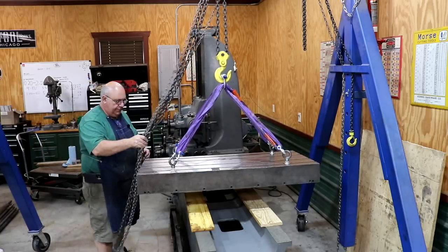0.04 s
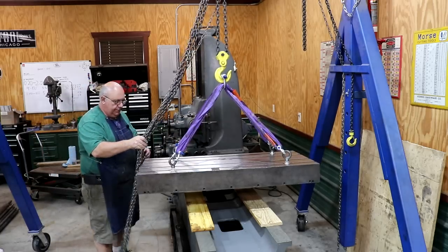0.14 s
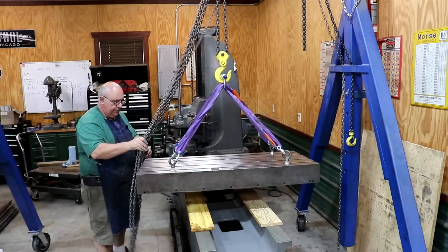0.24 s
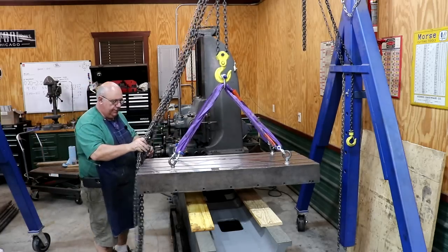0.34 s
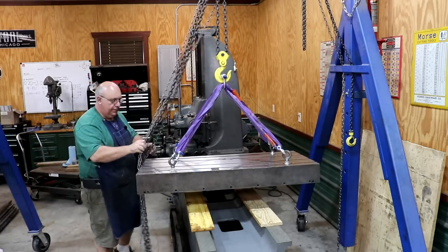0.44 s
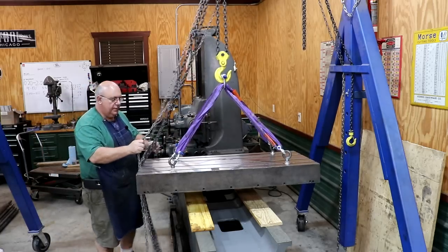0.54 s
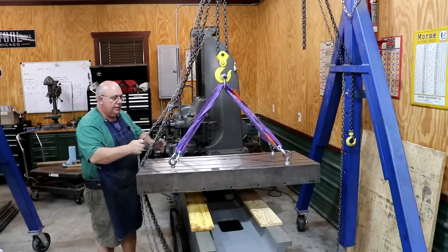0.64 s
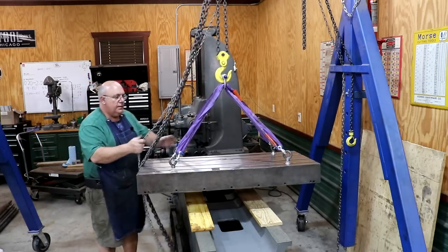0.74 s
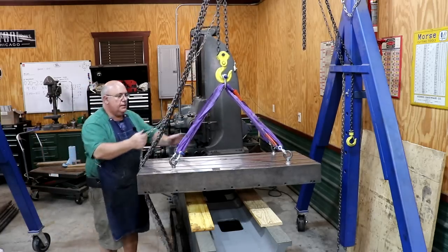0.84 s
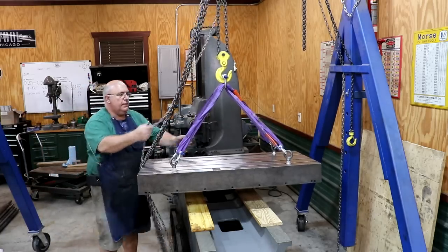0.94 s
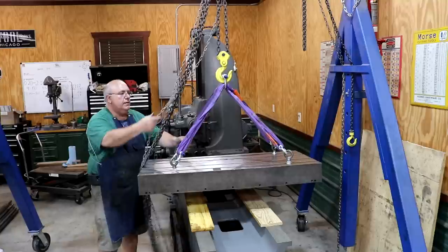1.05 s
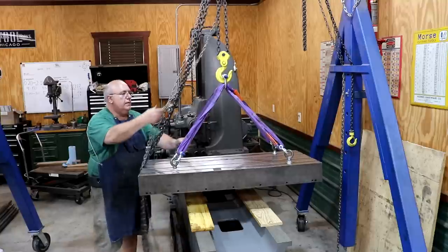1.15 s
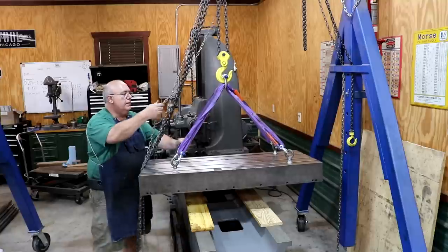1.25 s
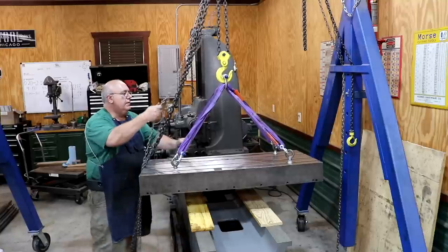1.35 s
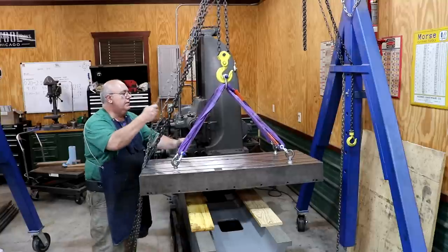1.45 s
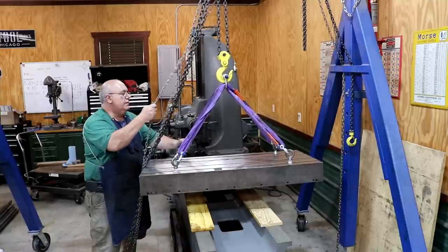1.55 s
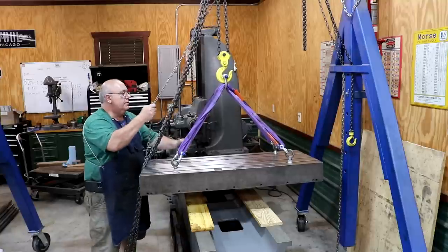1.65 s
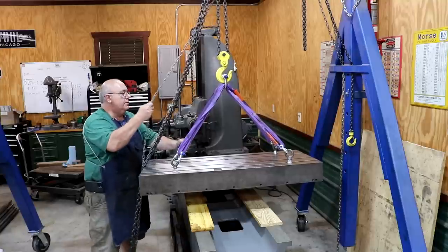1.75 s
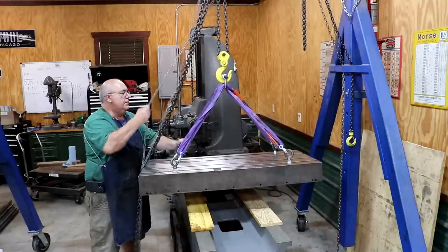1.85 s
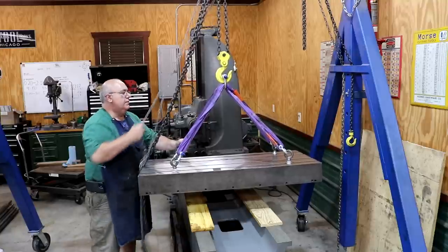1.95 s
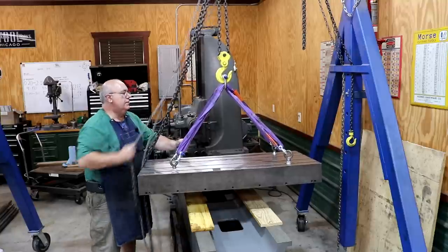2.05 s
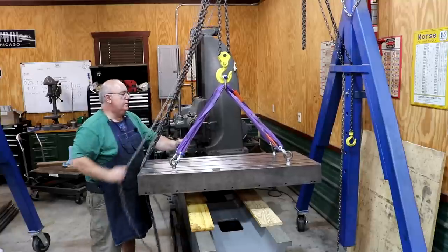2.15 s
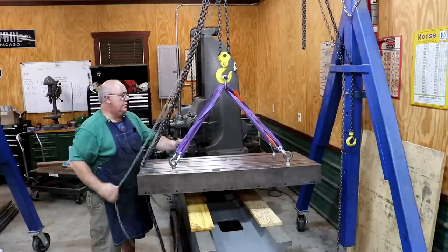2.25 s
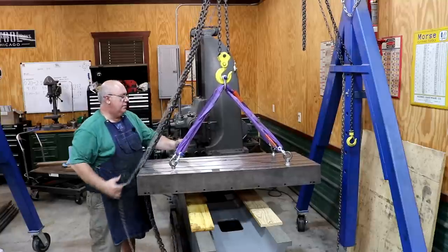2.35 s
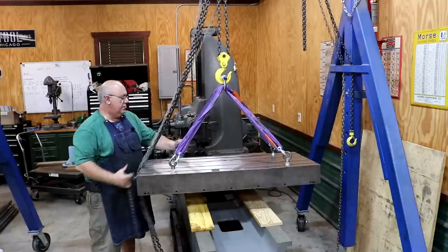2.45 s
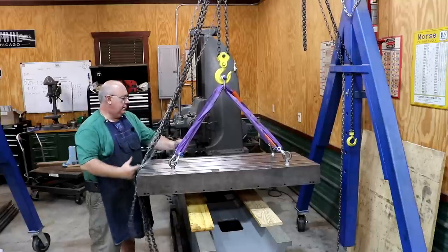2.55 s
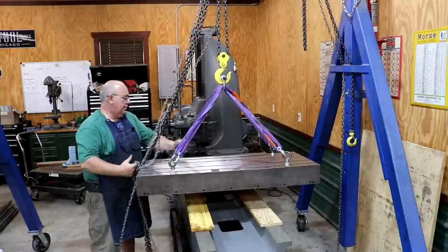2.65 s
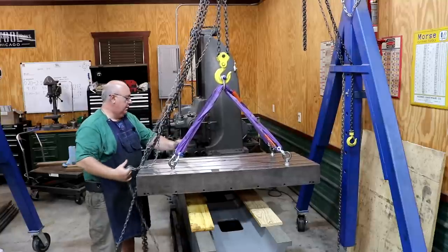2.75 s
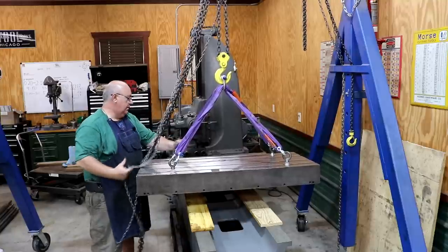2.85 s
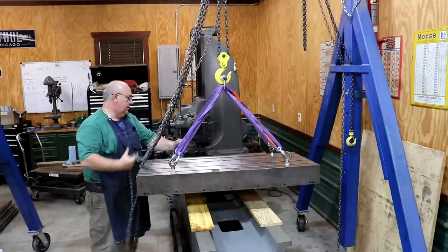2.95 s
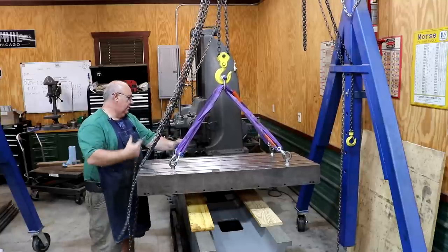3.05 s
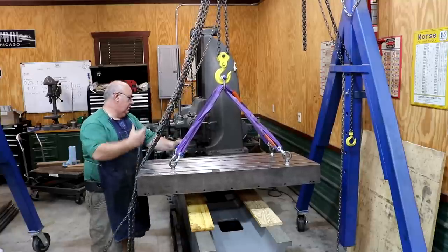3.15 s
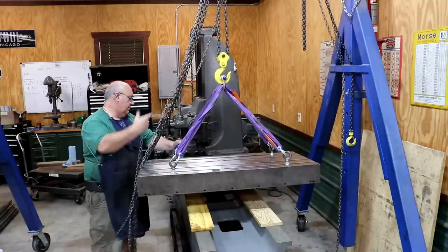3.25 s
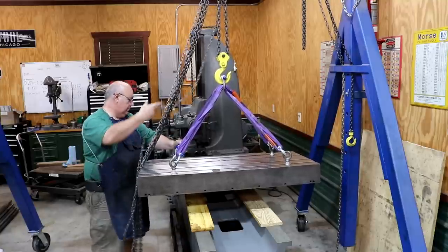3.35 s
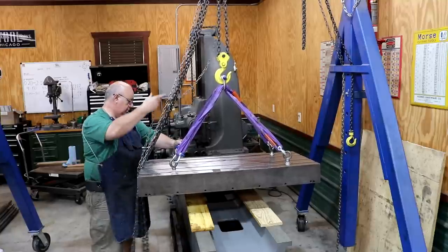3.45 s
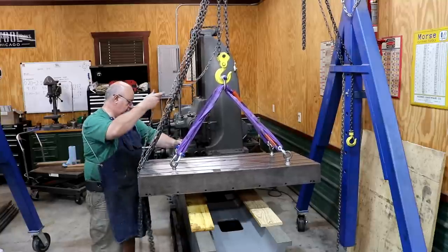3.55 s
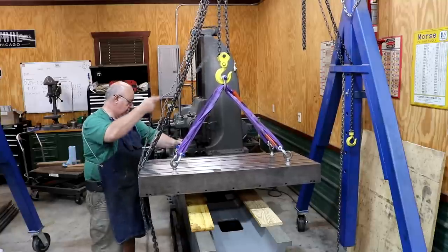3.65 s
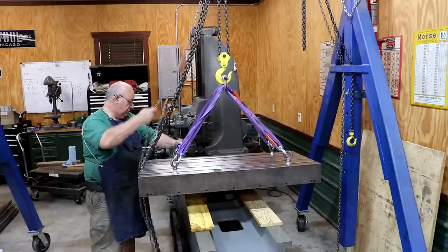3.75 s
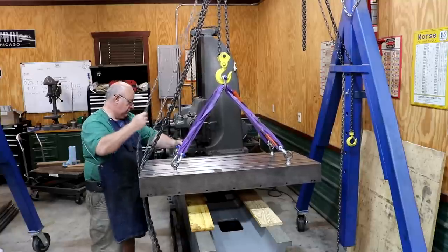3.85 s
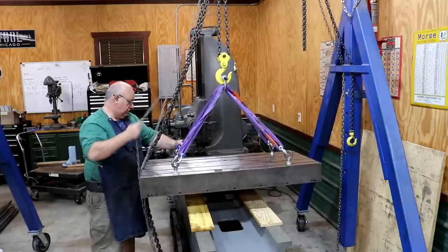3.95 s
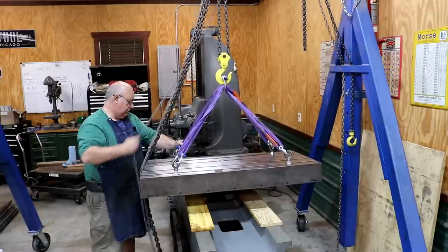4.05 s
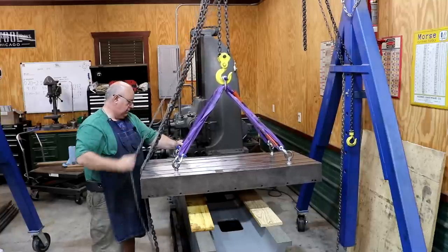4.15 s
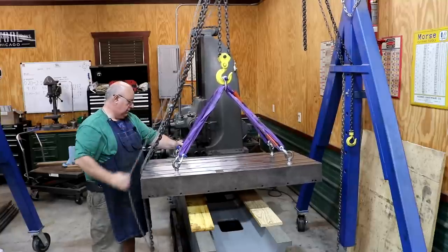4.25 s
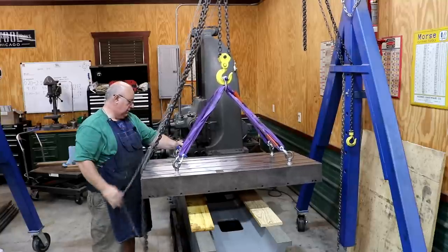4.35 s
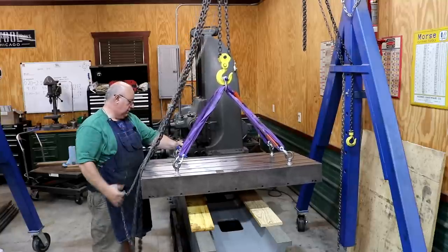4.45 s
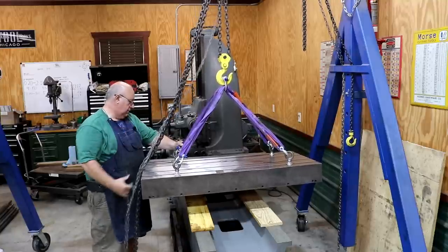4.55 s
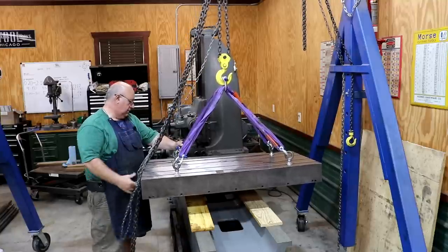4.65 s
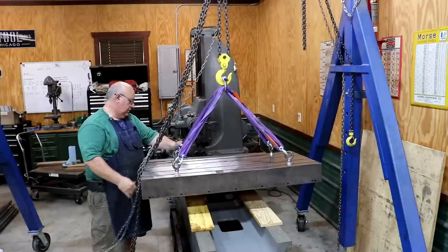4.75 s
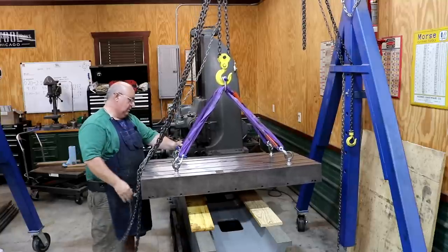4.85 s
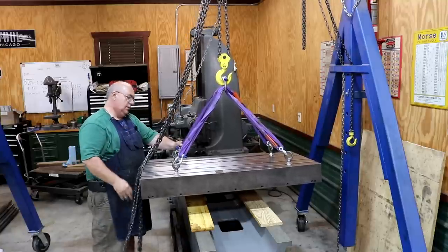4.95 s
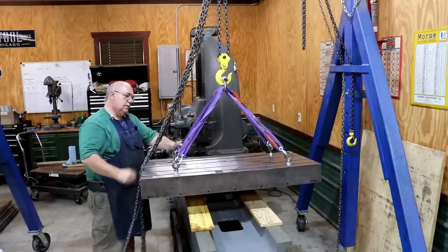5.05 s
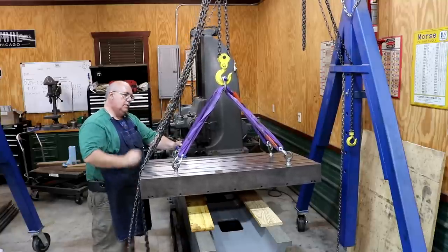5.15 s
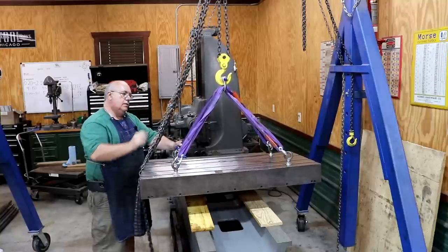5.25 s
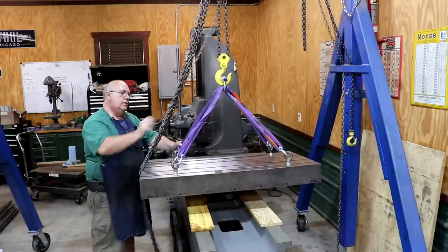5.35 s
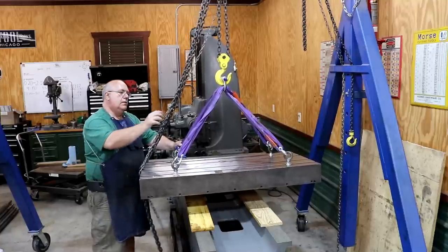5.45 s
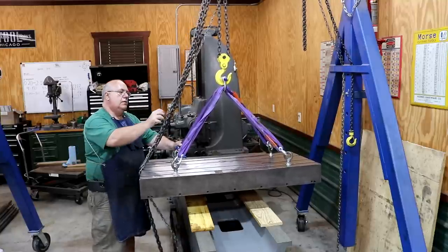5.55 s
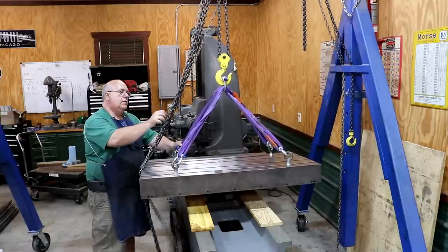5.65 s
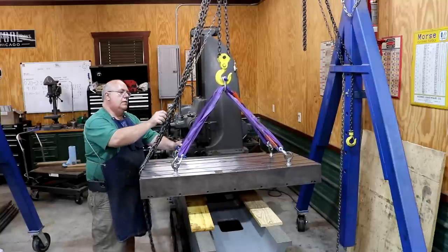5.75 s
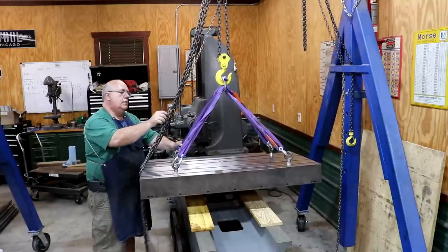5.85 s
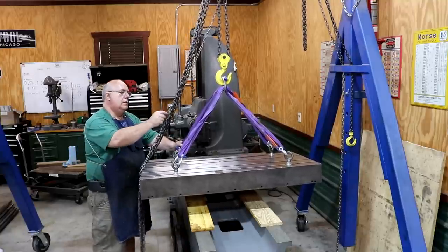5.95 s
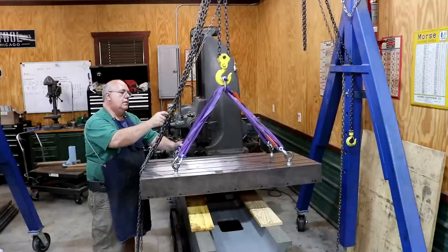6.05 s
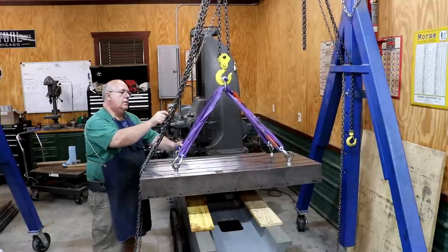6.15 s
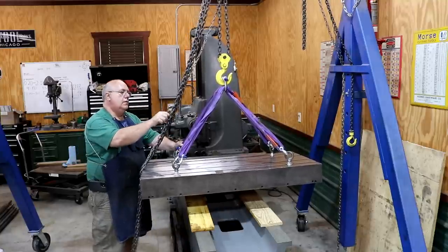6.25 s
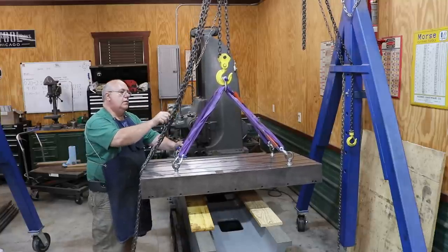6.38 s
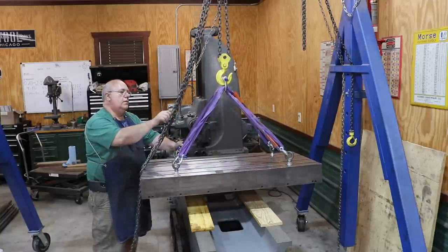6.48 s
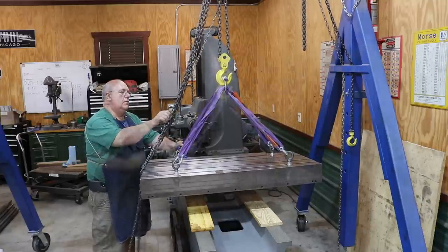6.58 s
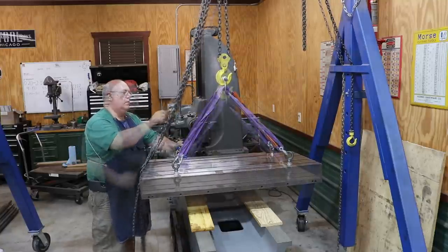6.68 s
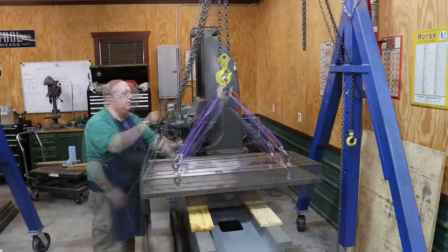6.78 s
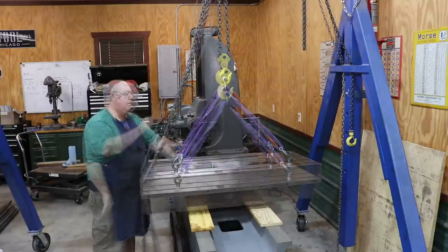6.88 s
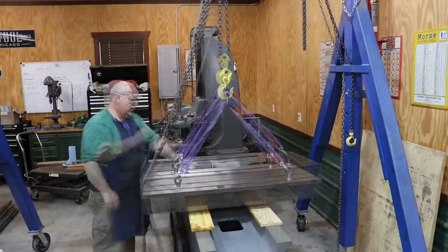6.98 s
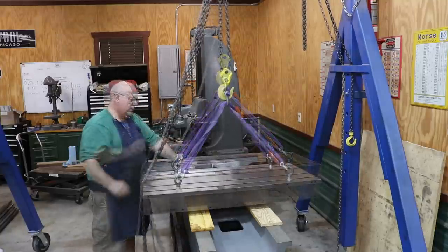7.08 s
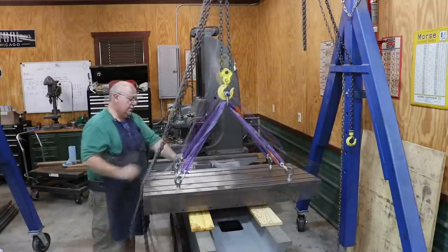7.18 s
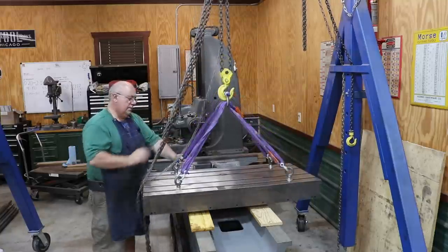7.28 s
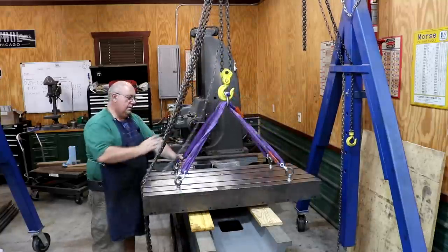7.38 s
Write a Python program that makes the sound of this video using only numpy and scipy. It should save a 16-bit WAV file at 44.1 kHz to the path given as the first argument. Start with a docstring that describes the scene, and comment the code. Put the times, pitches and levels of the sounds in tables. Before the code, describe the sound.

A man hauls a chain hoist in bursts: bright links click and clatter, the load slips twice with harsh ratcheting roars, and cloth bumps low.

```python
"""Hand-chain hoist in a workshop

A hand chain is hauled through a hoist on a steel gantry in a wooden workshop, heard from the wearer's chest.
Random collisions ring modes into jingle and rattle; single clicks tick close by and knocks sound the housing.
Twice the load slips down as a dense metallic rush of blows on steel modes.
Soft low pushes make cloth rumble; wavering sines hum in the steel, over a room tail and faint shop noise."""
import sys
import numpy as np
from scipy import signal
from scipy.fft import rfft, irfft, next_fast_len
from scipy.io import wavfile
from scipy.ndimage import uniform_filter1d

SR = 44100
rng = np.random.default_rng(int(sys.argv[2]) if len(sys.argv) > 2 else 0)


def decibels_to_gain(level_db):
    """Convert a level in decibels to a linear amplitude gain (20 dB per decade)."""
    exponent = np.asarray(level_db, float) / 20
    return 10 ** exponent


def store_pcm(level_fs):
    """Save levels as 16-bit WAV."""
    pcm = np.round(np.clip(level_fs, -1, 1) * 32767).astype(np.int16)
    wavfile.write(sys.argv[1], SR, np.atleast_2d(pcm).T)


N = 327222
T = np.arange(N) / SR

# slack hand chain swinging between pulls: t/s, jingle level/dB
SLACK = [(0.0, -51), (0.45, -47.5), (0.56, -38.5), (0.7, -43.5), (0.8, -75), (1.3, -81), (1.43, -34),
         (1.55, -49.5), (1.76, -50), (1.9, -43), (2.92, -44.5), (3.24, -44), (3.54, -52.5), (3.6, -59),
         (3.79, -54.5), (3.87, -39), (4.95, -48.5), (5.1, -37), (5.2, -67), (5.28, -45), (5.35, -54.5),
         (5.54, -45.5), (6.1, -58), (6.43, -62.5), (6.8, -68), (6.86, -42.5), (7.42, -51.5)]
# level of the jingle's top above 9.5 kHz: t/s, level/dB
JINGLE_TOP = [(0, -6.5), (1.3, -6), (1.6, -3), (1.9, 0), (2.8, -2.5), (2.95, 2), (3.2, 5.5), (3.55, 2.5),
              (3.7, -2.5), (4.5, -7.5), (5.1, 0.5), (5.5, -5.5), (6.1, -5.5), (6.8, -4), (7.42, -4.5)]
# ringing modes of the links: f/Hz, width/Hz, level/dB
LINK_MODES = [(4320, 120, -2), (5150, 90, -1)]
# ringing modes of the hoist housing: f/Hz, width/Hz, level/dB
HOUSING_MODES = [(727.4, 76, 5), (1354, 60, 0), (1814, 26, -4.5), (2535, 25, -3.5), (3365, 13.5, -4)]
# links dropping hard into the pockets of the fast wheel: t/s, relative level/dB
SEATS = [(1.9238, -21), (1.957, -37), (2.0066, -27), (2.076, -17), (2.1837, -12.5), (2.212, -16),
         (2.246, -20), (2.2755, -13.5), (2.3, -16), (2.3433, -16.5), (2.385, -19), (2.4122, -21),
         (2.451, -13.5), (2.6042, -28), (2.6292, -28), (2.6975, -37), (3.9081, -21.5), (3.9886, -18.5),
         (4.0151, -21.5), (4.053, -18), (4.1114, -18), (4.155, -16.5), (4.1912, -13), (4.2186, -16.5),
         (4.3044, -21), (4.3388, -15), (4.3719, -13.5), (4.4027, -13.5), (4.4346, -26), (4.461, -13),
         (4.5047, -16.5), (4.5475, -15.5), (4.5883, -33), (4.645, -28.5), (4.6641, -18.5), (4.7464, -19.5),
         (4.8317, -32.5)]


def unit(x):
    """Scale to rms 1."""
    return x / np.sqrt(np.mean(x ** 2))


def curves(rows):
    """Every column of a table after the time, as a value per sample."""
    s, *columns = np.transpose(rows)
    return [np.interp(T, s, c) for c in columns]


def colour(x, points):
    """Shape the spectrum along (f/Hz, gain/dB) points, straight over log frequency."""
    size = next_fast_len(len(x))
    hz, db = np.transpose(points)
    log_hz = np.log(np.fft.rfftfreq(size, 1 / SR) + 1)
    gain = decibels_to_gain(np.interp(log_hz, np.log(hz), db))
    return irfft(rfft(x, size) * gain, size)[:len(x)]


def ring(x, hz, width_hz):
    """One mode as a two-pole resonator; a unit impulse rings with amplitude 1 before decay."""
    w, r = 2 * np.pi * hz / SR, np.exp(-np.pi * width_hz / SR)
    return signal.lfilter([0, np.sin(w)], [1, -2 * r * np.cos(w), r * r], x)


def cut_below(x, hz):
    """Steep high-pass."""
    return signal.sosfilt(signal.butter(4, hz, "high", fs=SR, output="sos"), x)


def split_at(x, hz):
    """Low part and the remaining treble, in phase so that they add up to x."""
    low = signal.sosfiltfilt(signal.butter(2, hz, fs=SR, output="sos"), x)
    return low, x - low


def walk(rate):
    """Random levels held 1 / rate s and smoothed."""
    k = int(SR / rate)
    held = np.repeat(rng.standard_normal(N // k + 1), k)
    return uniform_filter1d(held, k)[:N]


def hits(rate, spread_db):
    """Random collisions per second; exponential level offsets stop at three times the spread."""
    offset = np.minimum(rng.exponential(size=N), 3)
    return (rng.random(N) < rate / SR) * decibels_to_gain(spread_db * offset)


def sounding(spans, column=0):
    """Gain from one dB column of separate spans, silent between them."""
    return sum((T > rows[0][0]) * (T < rows[-1][0]) * decibels_to_gain(curves(rows)[column]) for rows in spans)


def swell(s, held, db, rise_db, fall_db):
    """Gain that climbs to db, holds and fades, at steady dB per second."""
    return decibels_to_gain(db - rise_db * np.maximum(s - T, 0) - fall_db * np.maximum(T - s - held, 0))


def tones(rows):
    """Single modes struck once that ring out."""
    out = np.zeros(N)
    for s, db, hz, t60 in rows:
        strike = np.arange(N) == int(s * SR)
        out += decibels_to_gain(db) * ring(strike, hz, np.log(1000) / np.pi / t60)
    return out


def clatter(blows, modes, points, smear_s, modes_db, wander_db):
    """Blows ring the strong modes, each favoured in turn, and the countless weak ones as short coloured bursts."""
    strong = np.zeros(N)
    for hz, width, db in modes:
        push = blows * rng.standard_normal(N) * decibels_to_gain(wander_db * walk(25))
        strong += decibels_to_gain(db) * np.sqrt(width) * ring(push, hz, width)
    strong = unit(cut_below(strong, points[1][0]))
    power = signal.lfilter([1], [1, -np.exp(-2 / (smear_s * SR))], blows ** 2)
    weak = np.sqrt(power) * rng.standard_normal(N)
    return unit(decibels_to_gain(modes_db) * strong + unit(colour(weak, points)))


def shop_noise():
    """The shop's steady faint background: noise shaped in frequency."""
    # f/Hz, spectrum level/dB before scaling
    shop_colour = [(24, -38), (40, -34), (118, 4), (329, 12), (503, 9.5), (751, 9), (1020, -1), (1410, 5),
                   (2320, -17), (4460, -64), (7930, -17), (16000, -39)]
    return decibels_to_gain(-56.5) * unit(colour(rng.standard_normal(N), shop_colour))


def chain():
    """Links jostle over the wheel: their fine jingle, their ring, and the housing they shake."""
    # three pulls over the wheel: t/s, link ring level/dB, housing above the links/dB
    pulls = [
        [(1.908, -37, 1), (1.918, -28.5, -6), (2.064, -27.5, -6.5), (2.286, -26, -2), (2.47, -31, -1),
         (2.566, -34, 2), (2.72, -39.5, 4.5), (2.9, -60, -16)],
        [(3.86, -41, -2.5), (3.93, -43, 0.5), (4.07, -31.5, -9), (4.312, -28, -1), (4.49, -26.5, -17.5),
         (4.618, -29.5, -4), (4.818, -38, -4.5), (4.96, -58, 7)],
        [(6.85, -69, -4), (6.868, -38.5, -14), (6.9, -33, -13.5), (6.942, -46.5, 5), (7.084, -46, -10),
         (7.288, -51, 1.5), (7.42, -45.5, -2)],
    ]
    # fine modes of the jingle: f/Hz, width/Hz, level/dB
    jingle_modes = [(6290, 15, 20), (6590, 50, 6), (6840, 94, 39), (8100, 27, 8), (7900, 180, -11),
                    (9400, 43, 6), (12300, 410, -48), (13200, 170, -22)]
    # spectra of the short bursts: f/Hz, level/dB
    jingle_colour = [(3180, -27), (5400, -1), (6250, -1), (8090, 5), (9660, -5.5), (12300, -6),
                     (16000, -17)]
    link_colour = [(2120, -42.5), (3600, -1.5), (3910, -10.5), (5220, 2.5), (5800, -5), (7540, -20),
                   (12800, -120)]
    housing_colour = [(210, -35), (350, -21.5), (717, -5), (920, -1.5), (1310, -5), (2250, -0.5), (2580, 2),
                      (2830, -3), (4200, -12), (5460, -19), (9240, -120)]
    full_db, jingle_db = -32.5, -0.5  # ring at a full pull; jingle above it there
    growth = 1.41  # dB of jingle per dB of ring
    slack_ring_db, slack_housing_db = -11.5, -12  # relative to the slack jingle
    idle_db = -69  # housing never quite still

    pull, slack = sounding(pulls), decibels_to_gain(curves(SLACK)[0])
    pull_jingle = decibels_to_gain(full_db + jingle_db) * (pull / decibels_to_gain(full_db)) ** growth
    jingle_gain = np.hypot(pull_jingle, slack)
    link_gain = np.hypot(pull, decibels_to_gain(slack_ring_db) * slack)
    pull_housing = pull * sounding(pulls, column=1)
    housing_gain = np.hypot(pull_housing, decibels_to_gain(slack_housing_db) * slack + decibels_to_gain(idle_db))

    jostle = hits(550, spread_db=5)  # the same collisions drive all three
    jingle = clatter(jostle, jingle_modes, jingle_colour, smear_s=.003, modes_db=-11, wander_db=5)
    low, top = split_at(jingle, 9500)
    jingle = low + decibels_to_gain(curves(JINGLE_TOP)[0]) * top
    links = clatter(jostle, LINK_MODES, link_colour, smear_s=.007, modes_db=-2.5, wander_db=5)
    housing = clatter(jostle, HOUSING_MODES, housing_colour, smear_s=.01, modes_db=-.5, wander_db=6)
    return jingle_gain * jingle + link_gain * links + housing_gain * housing


def ticks():
    """Two links meet: a spark of a click, then a brief chatter; every pair rings at its own pitch."""
    # the louder ticks near the hands: t/s, peak level/dB before the low cut
    loud_ticks = [(0.1171, -15.5), (0.122, -16.5), (0.2827, -15), (0.2898, -15.5), (0.2996, -9),
                  (0.3404, -19), (0.4925, -15), (0.5035, -16), (0.5546, -28), (0.5872, -21), (0.6124, -18),
                  (0.6448, -23), (0.6672, -20), (0.675, -13.5), (0.6934, -29), (1.191, -22), (1.2606, -24),
                  (1.2841, -23), (1.3067, -16.5), (1.3368, -18.5), (1.3546, -26), (1.4048, -23),
                  (1.4091, -7.5), (1.4206, -9), (1.4246, -18), (1.4555, -12.5), (1.5252, -15),
                  (1.5872, -13.5), (1.6004, -18), (1.684, -20), (1.694, -24), (1.7184, -17), (1.7767, -25),
                  (1.8106, -16.5), (1.829, -20), (1.837, -19), (1.8785, -29), (1.897, -14), (2.7641, -18),
                  (2.8285, -29), (2.849, -13), (2.8523, -12), (2.8885, -16), (2.894, -15), (2.919, -17),
                  (2.9447, -16), (2.986, -20), (3.0263, -18.5), (3.0682, -38), (3.1245, -16),
                  (3.142, -17.5), (3.1518, -21), (3.1726, -14.5), (3.1826, -22), (3.2055, -20),
                  (3.213, -22), (3.2258, -10), (3.241, -17), (3.246, -8), (3.262, -14), (3.2909, -23),
                  (3.3067, -19), (3.3124, -17.5), (3.3353, -14), (3.3485, -23), (3.373, -16.5),
                  (3.3889, -17), (3.4229, -33), (3.429, -14), (3.448, -19), (3.4725, -11), (3.4793, -19),
                  (3.4966, -8.5), (3.5458, -15), (3.5557, -30), (3.5687, -19), (3.576, -27), (3.6702, -31),
                  (3.7335, -24), (3.7498, -20.5), (3.7867, -21), (3.791, -22), (3.8107, -14), (3.8732, -10),
                  (3.877, -10), (5.0167, -14), (5.0487, -7.5), (5.0967, -14), (5.1358, -22), (5.2111, -28),
                  (5.249, -28), (5.2637, -31), (5.2835, -20), (5.2989, -17.5), (5.3253, -24), (5.3439, -20),
                  (5.3569, -27), (5.3729, -24), (5.396, -23), (5.413, -28), (5.4417, -24), (5.5111, -33),
                  (5.5234, -31), (5.8849, -20.5), (6.067, -29), (6.1451, -30.5), (6.2745, -27),
                  (6.4525, -37), (6.53, -32), (6.5846, -29.5), (6.6196, -33), (6.7598, -29), (6.773, -29),
                  (6.786, -21), (6.818, -25), (6.8558, -22), (6.8607, -22), (7.1835, -32), (7.2747, -22)]
    ticks_per_s, small_db, spread_db = 120, 8.5, 5  # small random ticks, dB above the slack jingle
    base_hz, lift = 8930, 0.25  # lift: dB of pitch ratio per dB of the jingle's top

    out, t = np.zeros(N + 1024), T[:1024]
    gap, size = rng.exponential(size=(1000, 2)).T
    when = np.cumsum(gap) / ticks_per_s
    small = np.interp(when, *np.transpose(SLACK)) + small_db + spread_db * np.minimum(size, 2)
    rows = loud_ticks + [row for row in zip(when, small) if row[0] < T[-1]]
    for (s, db), noise in zip(rows, rng.standard_normal((len(loud_ticks) + 1000, 1025))):
        top_db = np.interp(s, *np.transpose(JINGLE_TOP))
        hz = base_hz * np.exp(0.1 * noise[-1]) * decibels_to_gain(lift * top_db)
        push = noise[:-1] * (np.exp(-t / .0004) + .45 * np.exp(-t / .003))
        edge = np.diff(push, prepend=0)  # the bright edge of the click
        tick = ring(push, hz, 0.28 * hz) + 0.8 * decibels_to_gain(top_db / 2) * edge
        out[int(s * SR):][:1024] += decibels_to_gain(db) * tick / np.abs(tick).max()
    return cut_below(out[:N], 4360)


def rumble():
    """Lumpy low pressure of cloth on the microphone: soft pushes in low bands that follow the loudest rub."""
    # cloth bumping the microphone: t/s, held/s, level/dB, centre f/Hz
    bumps = [(0.21, 0.024, -31, 86.5), (0.34, 0.078, -45.5, 84.6), (0.47, 0.021, -47.5, 182),
             (0.95, 0.029, -41.5, 198), (1.69, 0.033, -46, 205), (1.86, .02, -51, 181),
             (2.32, 0.018, -50.5, 116), (2.89, 0.048, -39, 149), (3.17, 0.036, -52.5, 136),
             (3.37, 0.1, -49, 131), (4.28, .01, -52, 103), (4.93, 0.039, -46, 117),
             (6.565, 0.0086, -47.5, 114), (6.865, .01, -53.5, 105)]
    # one long rub of cloth: t/s, level/dB
    rub = [(3.53, -64), (3.566, -25), (3.604, -30), (4.0, -27), (4.194, -38.5), (4.214, -54), (4.26, -58)]
    rub_hz, rustle_hz = 99.4, 147.6
    rise_db, fall_db = 700, 300  # of a bump, dB per s
    rustle_db, waver_db = -62, 3  # faint cloth noise throughout
    still_s, fade_db = 4.9, 8  # the wearer settles: start, dB per s

    gains = [swell(s, held, db, rise_db, fall_db) for s, held, db, _ in bumps]
    rustle = decibels_to_gain(rustle_db - fade_db * np.maximum(T - still_s, 0) + waver_db * walk(7.7))
    gains = np.array(gains + [sounding([rub]), rustle])
    centres = np.array([row[3] for row in bumps] + [rub_hz, rustle_hz], float)
    hz = uniform_filter1d(centres[gains.argmax(axis=0)], size=800)
    pushes = hits(300, spread_db=-1.5) * rng.standard_normal(N)
    lumps = np.zeros(N)
    for f, width in [(50, 35), (75, 45), (110, 60), (160, 90), (230, 130)]:  # f/Hz, width/Hz
        band = unit(cut_below(ring(ring(pushes, f, width), f, width), 0.43 * f))
        lumps += band * np.exp(-(np.log(f / hz) / 0.49) ** 2)  # bands near the centre sound most
    return gains.max(axis=0) * unit(lumps)


def hums():
    """Steel members of the gantry sing one note each, wavering in level and phase, while they are shaken."""
    # t/s where rise turns to fall, level/dB, rise/dB per s, fall/dB per s (below 0 climbs on), f/Hz, waver/dB
    steel = [(0.47, -52, 43, 40, 328, 3.5), (2.66, -39, 23, 110, 327.6, 2), (4.23, -38.5, 900, 25, 329, 4),
             (6.96, -46, 202, -10, 327.6, 2), (1.56, -39, 900, 110, 790, 6), (5.3, -48.5, 20, 43, 725, 5.5),
             (6.1, -52, 60, 20, 733, 5.5)]
    drift, waver = walk(3), walk(25)  # shared by all members
    out = np.zeros(N)
    for s, db, rise, fall, hz, waver_db in steel:
        gain = swell(s, 0, db - 2.5 + waver_db * waver, rise, fall)  # all 2.5 dB under the table
        out += gain * np.sin(2 * np.pi * hz * T + 2 * drift + waver_db / 4 * waver)
    return out


def knocks():
    """Links knock the housing: a noise crack and the housing modes, each blow with its own brightness."""
    # t/s, relative level/dB, brightness/dB per octave (many soft blows favour the high modes)
    blows = [(0.28, -34.5, 14.5), (0.49, -39, 14), (1.495, -31.5, 17), (1.525, -10, 0), (1.654, -37, 13.5),
             (1.915, -24.5, 8), (2.015, -9.5, -2), (2.057, -2.5, -16), (2.082, -4.5, 2), (2.149, -19, -8),
             (2.321, -7, 6.5), (2.376, -1.5, -0.5), (2.846, -16, -3.5), (3.251, -52, -5), (3.48, -23, -3),
             (3.91, -9.5, 2), (4.218, -2.5, -7), (4.285, -4.5, -6), (4.39, -32, -4), (5.21, -38.5, 11.5),
             (5.282, -21, -4), (6.908, -15.5, -1.5), (7.023, -23, 6.5), (7.096, -21.5, 5.5),
             (7.184, -23, 7.5), (7.274, -20.5, 4)]
    out, t = np.zeros(N + 8192), T[:8192]
    hz, width, mode_db = np.transpose(HOUSING_MODES)[:, :, None]
    for (s, db, tilt_db), noise in zip(blows, rng.standard_normal((len(blows), 8192))):
        gains = decibels_to_gain(mode_db + tilt_db * np.log2(hz / 1500) + 2.5 * noise[:len(hz), None])
        decay = np.exp(-np.pi * 1.8 * width * t)  # faster than when jostled
        modes = np.sum(gains * np.sin(2 * np.pi * hz * t) * decay, axis=0)
        crack = ring(noise * np.exp(-t / 0.012), 4320, 4500)
        blow = modes / np.abs(modes).max() + 1.03 * decibels_to_gain(tilt_db) * crack / np.abs(crack).max()
        out[int(s * SR):][:8192] += decibels_to_gain(db - 7.5) * blow
    return out[:N]


def pings():
    """Lone tones of hooks and brackets: modes struck once."""
    # t/s, level/dB, f/Hz, t60/s
    hooks = [(.295, -42, 1372, 0.73), (0.531, -43, 1374, 1), (1.494, -20.5, 5300, .025),
             (1.496, -23, 4900, .025), (1.527, -29, 760, 0.22), (1.527, -27, 811, 0.31),
             (5.212, -29, 5110, 0.041), (5.285, -30.5, 3540, 0.044), (5.285, -37, 5200, 0.045),
             (3.25, -35, 754, 0.083), (3.48, -44, 715, 0.32)]
    return tones(hooks)


def load():
    """The brake lets go: very dense chatter through the steel, its treble dying first."""
    # the two slips: t/s, level/dB
    slips = [
        [(0.7, -56), (0.712, -30), (0.718, -22), (0.88, -20), (1.092, -29.5), (1.388, -52), (1.4, -63)],
        [(5.54, -53), (5.564, -28.5), (5.586, -22.5), (5.868, -32.5), (6.25, -63.5)],
    ]
    # modes of the load's steel: f/Hz, width/Hz, level/dB
    load_modes = [(1210, 19, -6), (1710, 37, -3), (1920, 27, -4), (2060, 27, -5), (2490, 36, 0),
                  (2680, 79, -5), (3010, 19, -6), (3310, 41, -5), (3450, 45, -5), (3850, 27, -3),
                  (4180, 70, -7), (4380, 20, -7), (4670, 110, -8), (5320, 81, -11), (5990, 130, -11),
                  (6200, 38, -8)]
    # spectrum of the short bursts: f/Hz, level/dB
    load_colour = [(240, -118), (400, -15), (690, -17), (949, -3.5), (1520, -5), (1660, -3.5),
                   (1820, -14.5), (2430, -5.5), (3050, -8), (7350, -8.5), (15000, -38)]
    start_db, loss_db = 3, 22  # treble at the start of a slip; its loss in dB per s

    blows = hits(2500, spread_db=3.5)
    rush = clatter(blows, load_modes, load_colour, smear_s=0.02, modes_db=1.5, wander_db=1.5)
    low, treble = split_at(rush, 5000)
    first, second = slips[0][0][0], slips[1][0][0]
    since = T - np.where(T < second, first, second)
    treble_db = start_db - loss_db * np.maximum(since, 0)
    return sounding(slips) * (low + decibels_to_gain(treble_db) * treble)


def snap():
    """The brake pawl snapping free: very short struck modes, thinned by a low cut."""
    # t/s, level/dB before the cut, f/Hz, t60/s
    pawl = [(.7112, -12.5, 2880, 0.016), (.7112, -7, 3530, 0.0075), (.7112, -28, 1160, 0.019)]
    return cut_below(tones(pawl), 780)


def pockets():
    """Each link that seats throws a short spray of treble that swells over a few milliseconds."""
    power = np.zeros(N)
    for s, db in SEATS:
        power[int(s * SR)] = decibels_to_gain(db) ** 2
    t = T[:4096] / 0.0024  # in units of the rise time
    power = np.abs(signal.fftconvolve(power, t * np.exp(-t))[:N])
    spray = ring(cut_below(rng.standard_normal(N), 1900), 7450, 1530)
    return np.sqrt(power) * unit(spray)


def clanks():
    """A seating link also rings links and housing, favouring different modes each time, a little off pitch."""
    ring_db, scatter_db, damping = -14.5, 6.5, 1.27  # level against the seat, mode scatter, decay factor
    out, t = np.zeros(N + 4096), T[:4096]
    hz, width, mode_db = np.transpose(HOUSING_MODES + LINK_MODES)[:, :, None]
    for (s, db), chance in zip(SEATS, rng.standard_normal((len(SEATS), 2, len(hz), 1))):
        gains = decibels_to_gain(mode_db + scatter_db * np.clip(chance[0], -3, 1.2))
        modes = gains * np.sin(2 * np.pi * hz * (1 + 0.022 * chance[1]) * t)
        decay = np.exp(-np.pi * damping * (width + 20) * t)
        out[int(s * SR):][:4096] += decibels_to_gain(db + ring_db) * np.sum(modes * decay, axis=0)
    return out[:N]


def tinkle():
    """A small shackle tinkling very high: brief modes struck once."""
    # t/s, level/dB, f/Hz, t60/s
    shackle = [(3.125, -33, 13500, .08), (3.15, -34, 13400, .08), (3.185, -30, 13600, .05),
               (3.204, -20, 13500, .04), (3.209, -13.5, 12200, 0.013), (3.213, -22, 14200, .02),
               (3.217, -22, 11300, 0.016), (3.24, -26, 12300, .02), (3.291, -33, 13900, .03)]
    return tones(shackle)


def step():
    """A shoe set down: heel tap, then the floor's thud, each one damped mode."""
    # t/s, level/dB, f/Hz, t60/s
    shoe = [(6.563, -31, 470, 0.027), (6.568, -39, 105, 0.1)]
    return tones(shoe)


def room(x):
    """A diffuse tail that swells in over 9 ms; the highest band dies far sooner than the rest."""
    # f/Hz, t60/s
    room_t60 = [(300, 0.44), (1200, 0.44), (4000, 0.6), (11000, 0.064)]
    t = T[:SR]
    tail = np.zeros(SR)
    for hz, t60 in room_t60:
        band = unit(ring(rng.standard_normal(SR), hz, hz))
        tail += band * np.sqrt(hz / t60) * decibels_to_gain(-60 * t / t60)
    tail = tail * np.clip(t / 0.0089, 0, 1)
    return signal.fftconvolve(x, tail / np.sqrt(np.sum(tail ** 2)))[:N]


def scene():
    """The hoist overhead is wetter than the links in the hands; long single notes carry their own ring."""
    near = ticks() + pockets() + tinkle()
    hoist = chain() + cut_below(knocks() + clanks(), 495)
    wet = room(decibels_to_gain(-10.0) * near + decibels_to_gain(-4.0) * hoist)
    notes = hums() + pings() + step() + snap()
    return (near + hoist + wet + load() + rumble() + notes + shop_noise())[None]


def roll_off(x):
    """The treble ends steeply here."""
    return signal.sosfilt(signal.butter(12, 16850, fs=SR, output="sos"), x)


def record(dry):
    """A steep elliptic low-pass cuts the top above 15.75 kHz."""
    low_pass = signal.ellip(8, .2, 50, 15750, fs=SR, output="sos")
    mix = signal.sosfilt(low_pass, dry)
    return roll_off(mix)


dry = scene()
out = record(dry)
store_pcm(out)
```